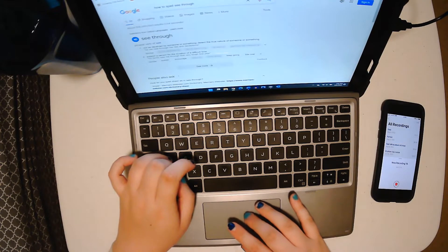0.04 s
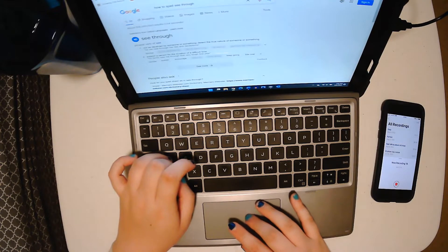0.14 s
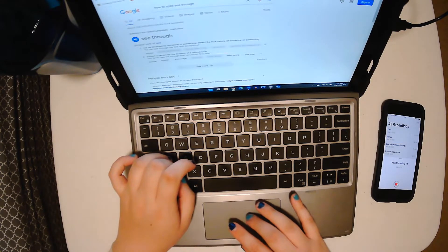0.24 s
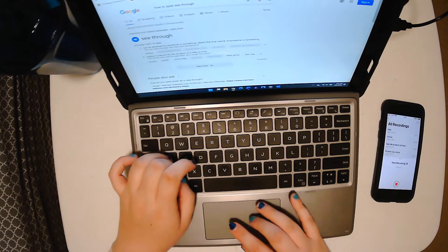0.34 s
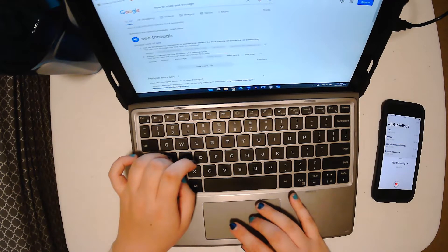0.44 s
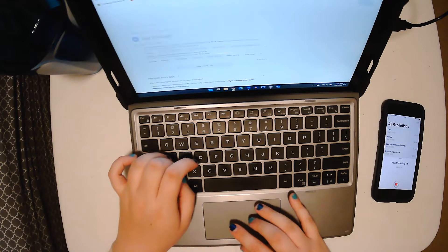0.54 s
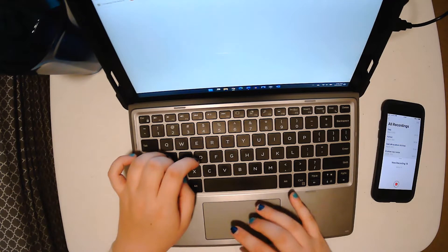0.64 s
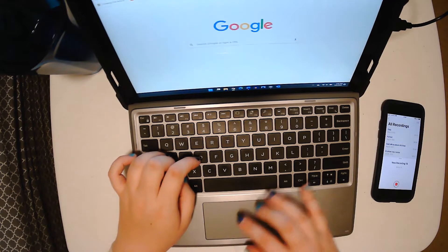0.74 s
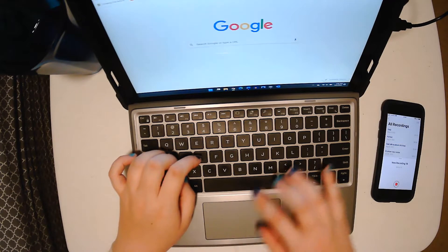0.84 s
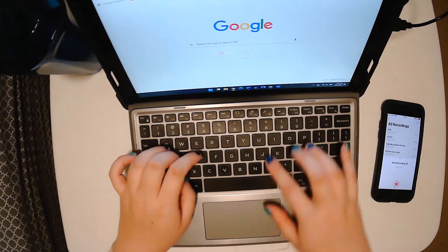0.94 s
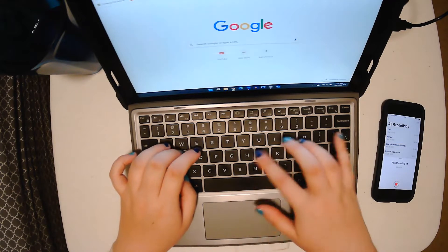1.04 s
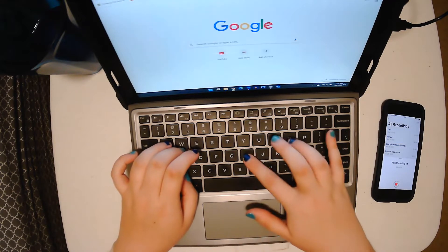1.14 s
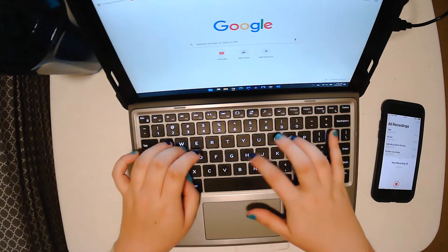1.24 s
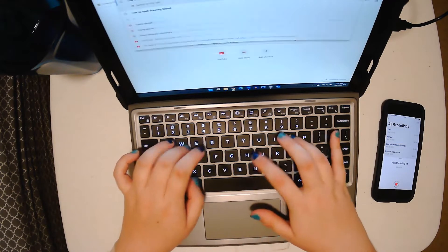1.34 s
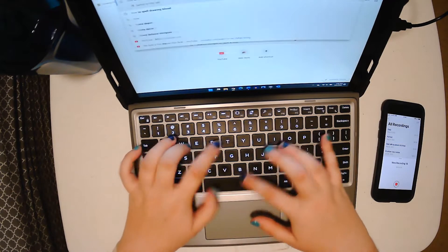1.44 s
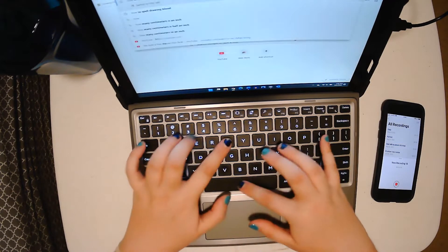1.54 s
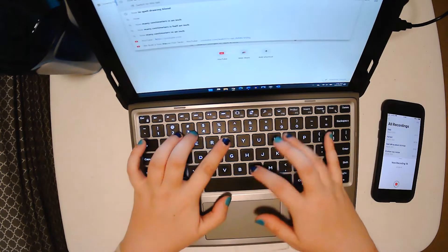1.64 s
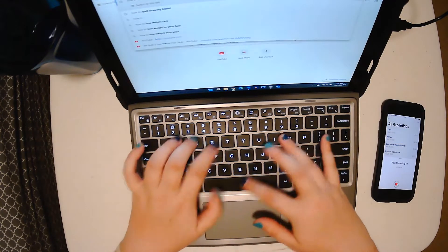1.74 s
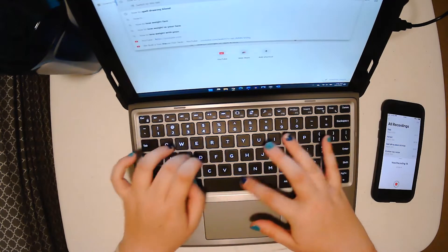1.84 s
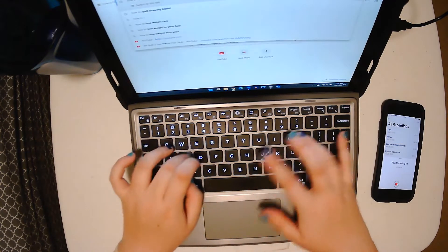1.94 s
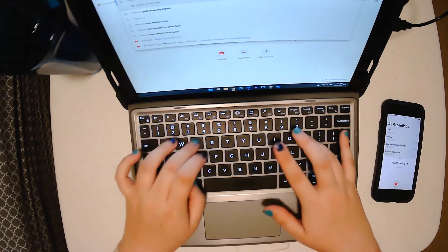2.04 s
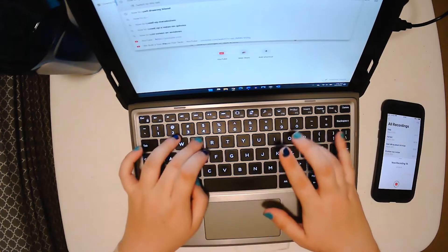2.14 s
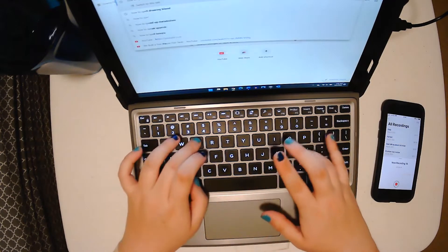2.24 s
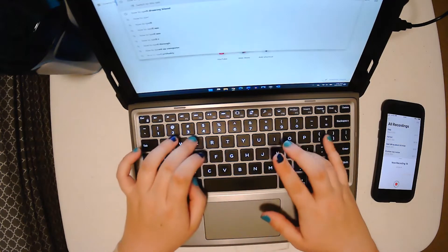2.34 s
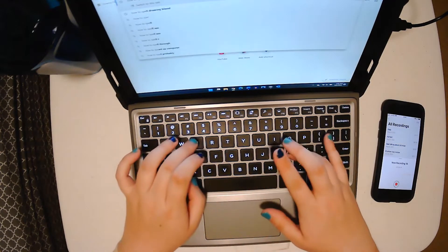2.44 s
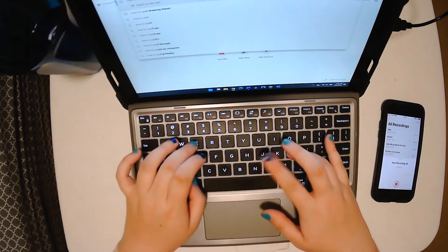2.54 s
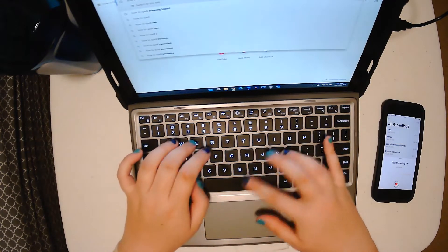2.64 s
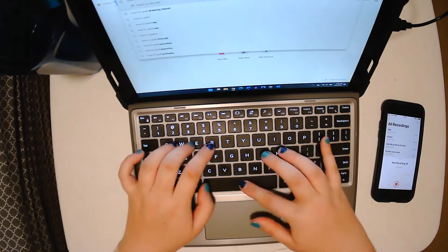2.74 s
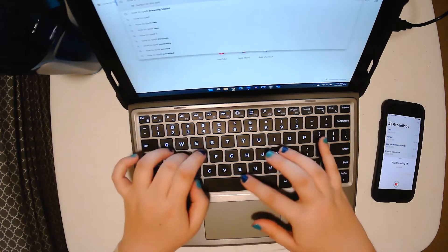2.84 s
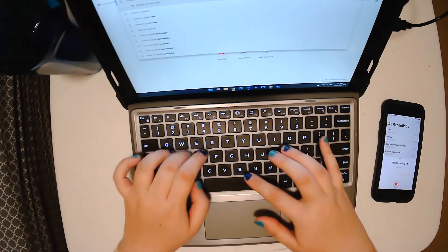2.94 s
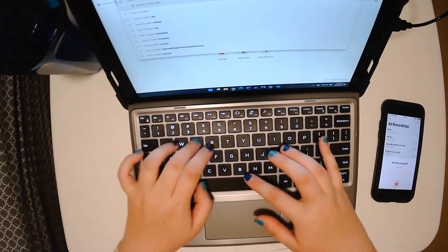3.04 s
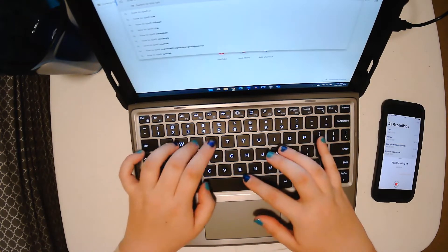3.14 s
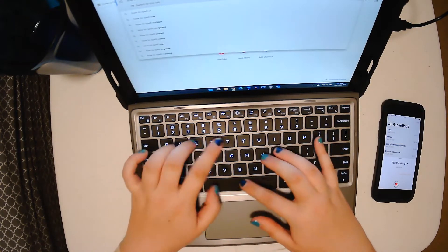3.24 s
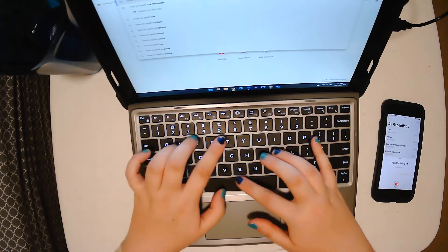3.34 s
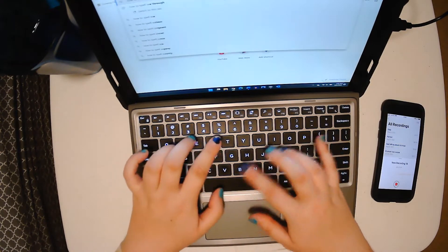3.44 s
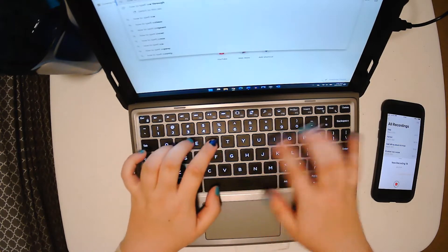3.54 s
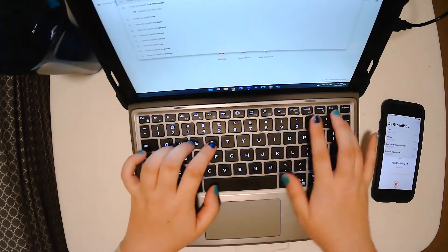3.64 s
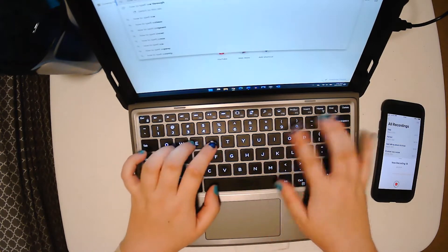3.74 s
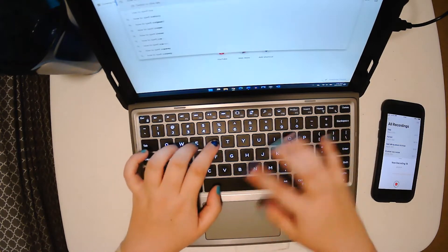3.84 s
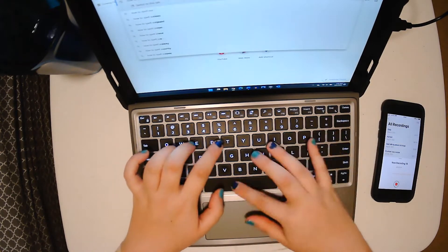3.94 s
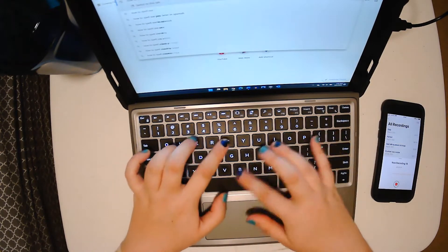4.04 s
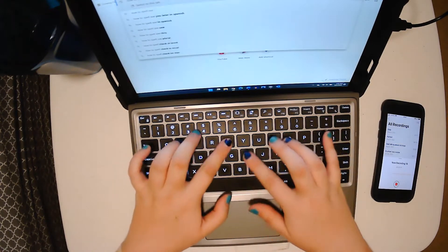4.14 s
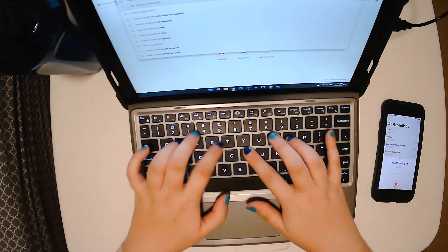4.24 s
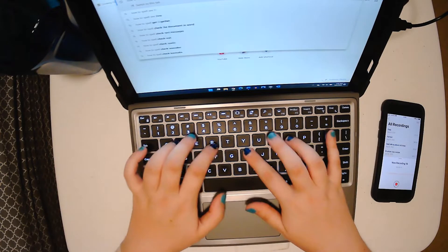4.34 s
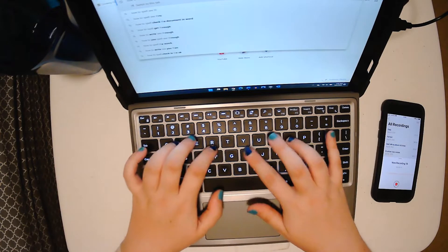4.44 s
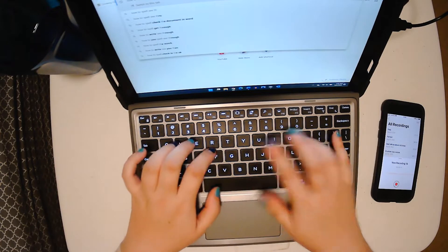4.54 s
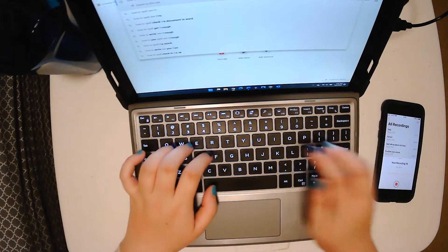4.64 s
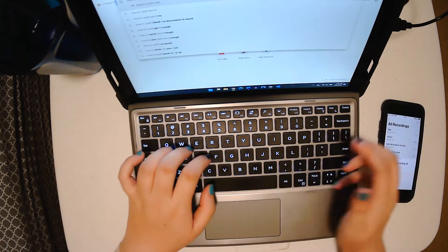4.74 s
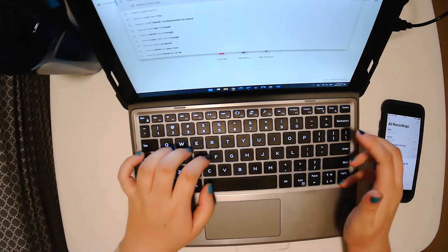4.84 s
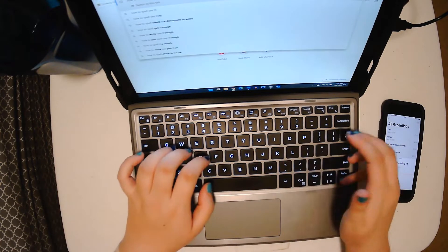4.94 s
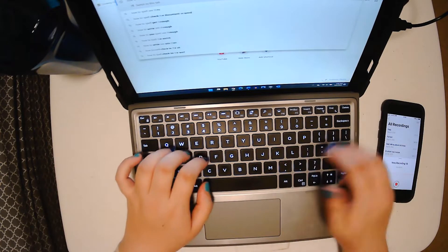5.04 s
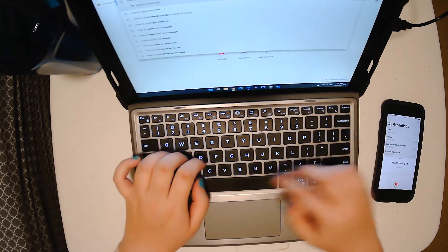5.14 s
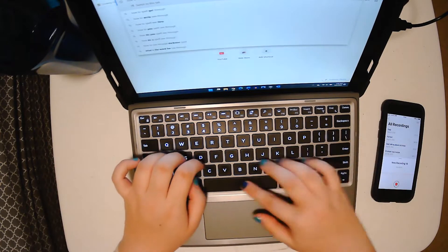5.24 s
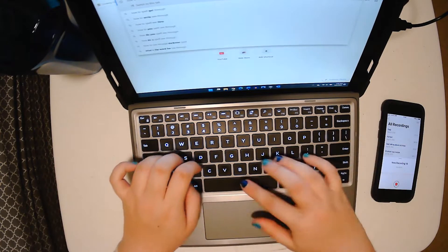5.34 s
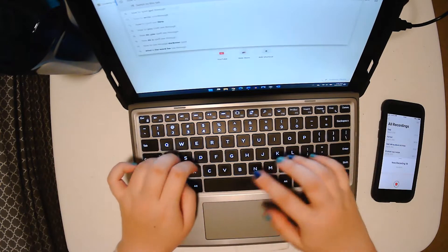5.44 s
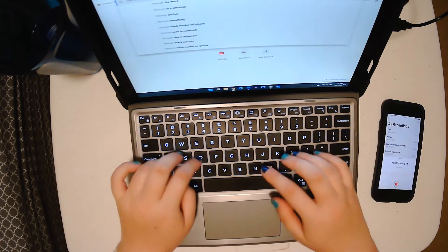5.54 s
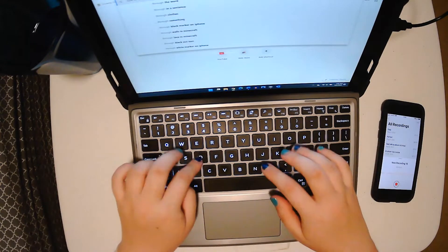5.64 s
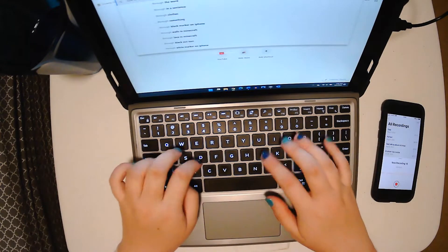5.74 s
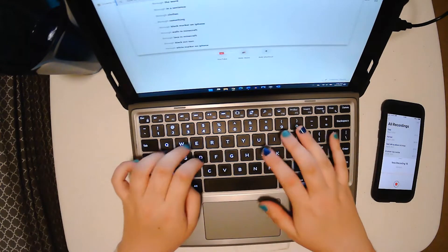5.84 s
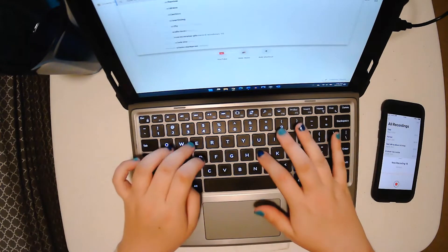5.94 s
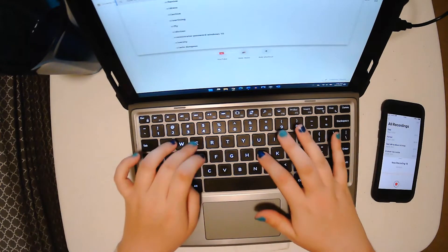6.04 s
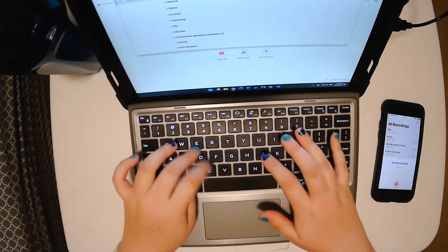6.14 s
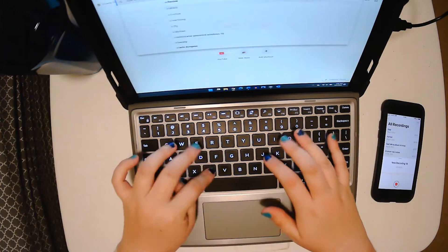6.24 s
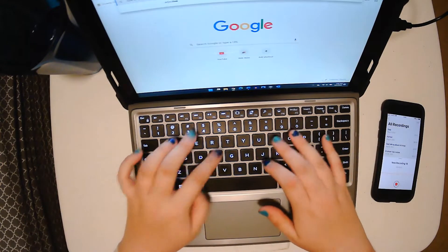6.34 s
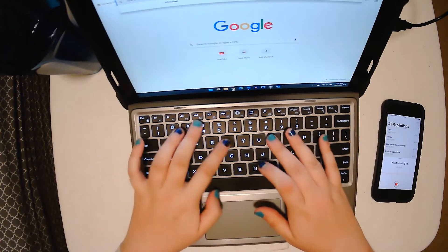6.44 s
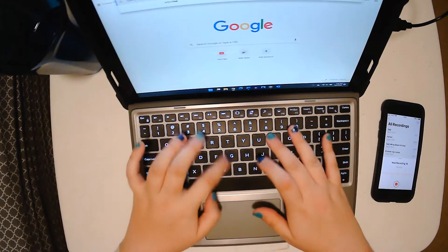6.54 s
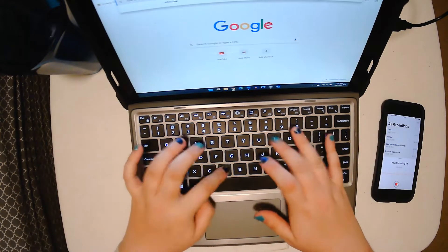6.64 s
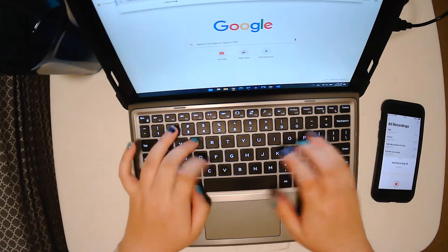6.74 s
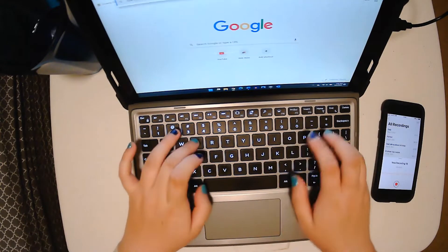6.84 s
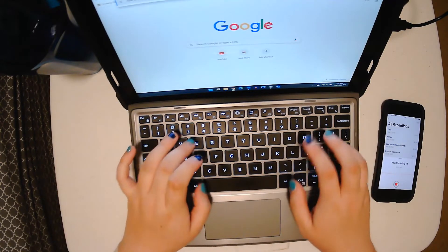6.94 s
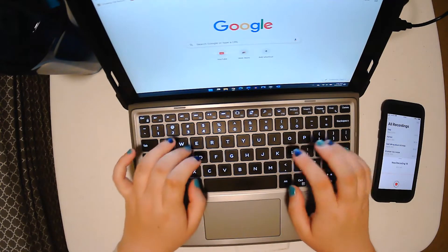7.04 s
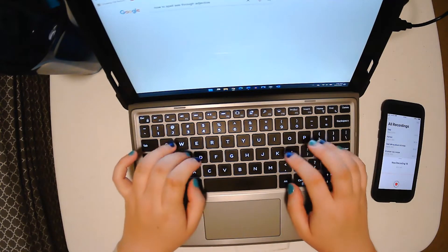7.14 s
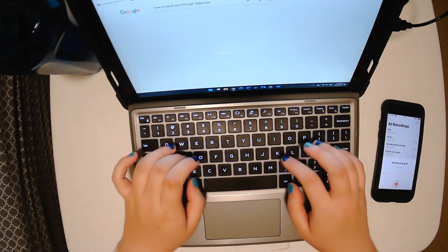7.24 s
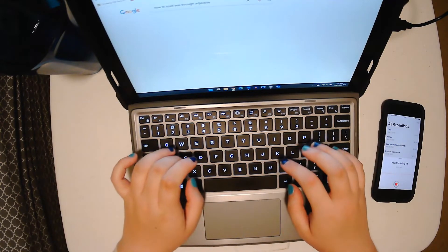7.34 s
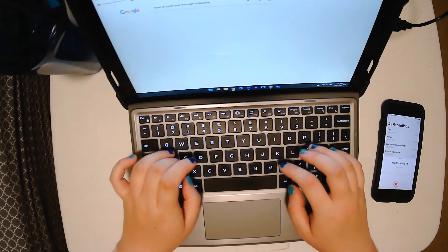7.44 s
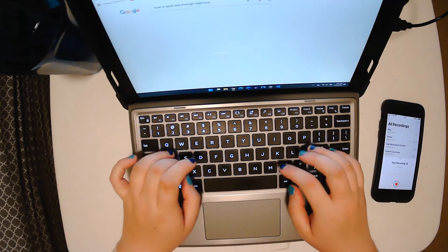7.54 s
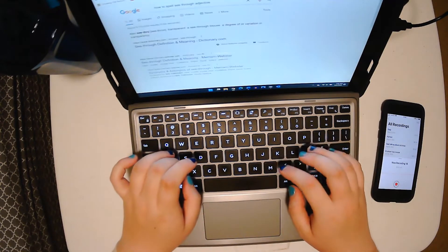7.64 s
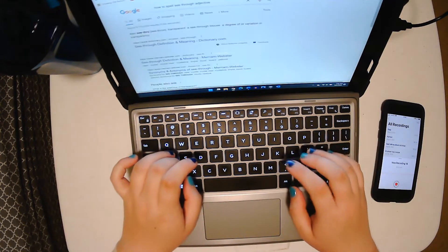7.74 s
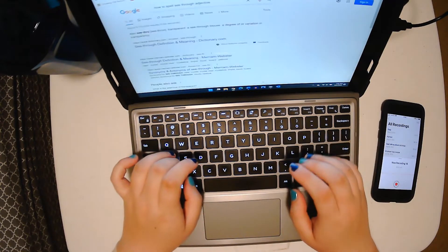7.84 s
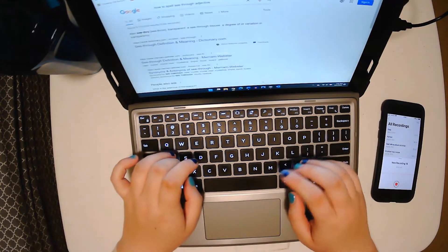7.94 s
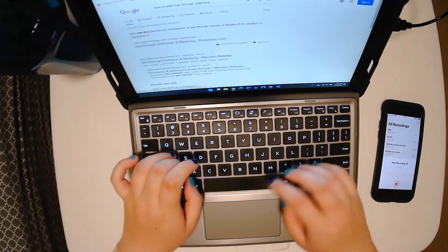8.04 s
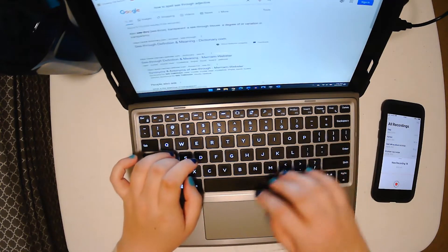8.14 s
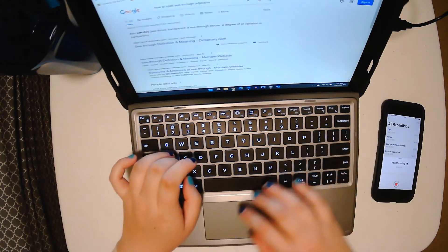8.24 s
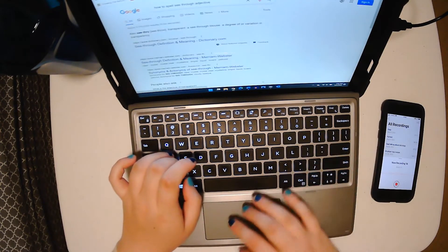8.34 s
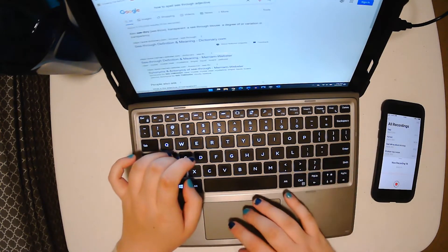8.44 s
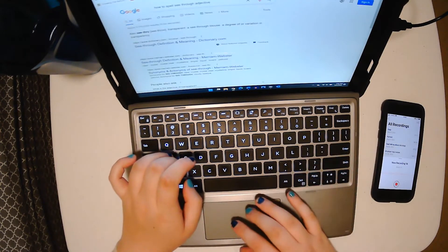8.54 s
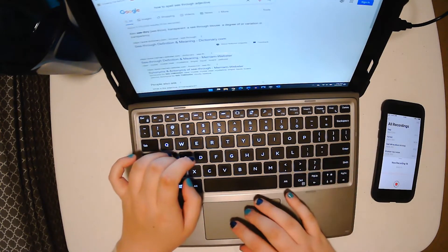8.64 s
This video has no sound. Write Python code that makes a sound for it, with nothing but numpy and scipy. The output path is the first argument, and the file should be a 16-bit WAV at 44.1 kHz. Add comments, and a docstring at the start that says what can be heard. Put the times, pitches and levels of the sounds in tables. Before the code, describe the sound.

Close above a laptop on a table in a quiet room, one channel. After a near-silent second with a faint bump and a hand graze, fingernails type in quick uneven bursts, with low double booms from the space bar. Brief gaps break the runs. One key is slammed hard near six seconds, more fast strokes follow, then a light enter click, quiet, and a dull touchpad thump.

```python
"""A quiet room, close above a laptop on a table: quick runs of typing.
Each stroke layers a fingernail tick, the key's snap, a clack as it lands, a knock in the case and a thud in the table.
Snap, clack and knock are shaped noise and impulses; the deck, lid and table ring as decaying sines.
The space bar booms on the way down and again on the way up; hands graze and bump, and a touchpad thumps late on.
Skin brushes the case as swells of grainy noise; a low hum of sines and a faint coloured hiss lie underneath."""
import sys
import numpy as np
from scipy import signal
from scipy.fft import rfft, irfft, next_fast_len
from scipy.io import wavfile
from scipy.ndimage import uniform_filter1d

SR = 44100
rng = np.random.default_rng(int(sys.argv[2]) if len(sys.argv) > 2 else 0)


def file_out(sig):
    """Save sig as 16-bit WAV at sys.argv[1]."""
    # one column per channel
    cols = np.atleast_2d(sig).T
    # limit, then scale
    lim = np.clip(cols, -1, 1)
    pcm = np.round(lim * 32767).astype(np.int16)
    wavfile.write(sys.argv[1], SR, pcm)


N = 383229  # length in samples

# Room air colour. Each row: frequency in Hz, relative level in dB.
AIR_SPECTRUM = [(12, -18), (24, -8.5), (38, -19.5), (55, -20), (91, -21.5), (123, -22), (262, -32),
                (527, -40.5), (1120, -44), (2400, -48), (3200, -48.5), (8000, -55), (13000, -60),
                (15500, -68), (16200, -80)]
# Steady hum tones. Each row: frequency in Hz, rms level in dB.
HUM_TONES = [(26.7, -50.5), (119.5, -68)]
# Decay of the room's tail. Each row: frequency in Hz, t60 (time to fall by 60 dB) in seconds.
ROOM_DECAY = [(100, 0.3), (500, 0.33), (2000, 0.33), (8000, 0.19), (15000, 0.061)]
# Skin sliding on the case. Each row: centre in seconds, standard deviation of the swell in seconds, peak level in dB.
BRUSHES = [(.776, .012, -60), (.82, 0.043, -64), (0.866, 0.01, -45.5), (1.125, .03, -60),
           (1.185, .045, -54.5), (1.408, 0.028, -64), (1.997, 0.04, -60), (4.146, 0.064, -61.5),
           (4.95, 0.088, -59.5), (5.39, 0.053, -58.5), (8.28, 0.018, -51.5)]
# Colour of skin friction. Each row: frequency in Hz, relative level in dB.
SKIN_SPECTRUM = [(150, -18), (600, 1.5), (1300, -4.5), (2200, -1.5), (2700, 2), (3400, -0.5), (5300, -1.5),
                 (7000, -6.5), (10000, -3.5), (13000, -10), (16000, -19)]
# Colour of the touchpad thump. Each row: frequency in Hz, relative level in dB.
TOUCHPAD_SPECTRUM = [(60, -14), (150, -1.5), (290, 1.5), (450, -6), (620, -2.5), (850, -22), (1500, -22),
                     (2300, -17.5), (3500, -32)]
# Blows that shake the lid. Each row: start in seconds, level in dB.
LID_JOLTS = [(1.935, -33.5), (4.686, -52.5), (4.876, -52), (5.776, -42.5), (6.621, -40), (7.127, -30.5)]
# Modes of the open lid. Each row: frequency in Hz, relative level in dB, t60 in seconds.
LID_MODES = [(226, -9, 0.18), (295, -4.5, 0.2), (370, 0, 0.061), (478, -1, 0.12), (566, 1.5, .14),
             (607, 0, 0.087), (761, 0, 0.046), (904, -8, 0.069), (1007, 3.5, 0.047), (1300, -3, 0.041)]
# Fingers that graze a key without pressing it. Each row: start in seconds, force in dB, snap in dB.
GRAZES = [(0.778, -50, -57), (0.8679, -45, -46.5), (1.3447, -58, -57), (1.941, -35.5, -55),
          (2.724, -54.5, -58), (4.509, -51.5, -69), (4.688, -53, -68), (4.88, -55, -74)]
# A resting hand shifts its weight. Each row: start in seconds, table thud in dB.
BUMPS = [(0.326, -34.5), (7.58, -45.5)]
# Colour of the snap under the nail. Each row: frequency in Hz, relative level in dB before tilt and scatter.
SNAP_SPECTRUM = [(900, -18), (2500, -4.5), (4200, -6.5), (5500, -4), (7500, -2), (9600, -3), (11500, -10.5),
                 (13800, -12.5), (15500, -26), (16500, -33)]
# Colour of the keycap clack. Each row: frequency in Hz before a small random shift, relative level in dB.
KEYCAP_SPECTRUM = [(400, -24), (780, -11), (950, -9.5), (1170, 3.5), (1420, -1), (1680, -0.5), (1900, -3.5),
                   (2250, -7.5), (2700, -22.5), (4500, -36.5)]
# Colour of the case knock. Each row: frequency in Hz before a small random shift, relative level in dB.
CASE_SPECTRUM = [(170, -22), (250, -9.5), (300, 4.5), (345, 2), (400, 2), (450, 0.5), (510, 2), (580, -4.5),
                 (680, -7.5), (790, -5.5), (950, -16), (1300, -31)]
# Modes of the deck under the keys. Each row: frequency in Hz, relative level in dB, t60 in seconds.
DECK_MODES = [(166.1, -3.5, 0.071), (198, 1, 0.066), (215.7, -10, 0.098)]
# Modes of the table. Each row: frequency in Hz, relative level in dB, t60 in seconds.
TABLE_MODES = [(53.7, -2.5, 0.22), (74.4, -1.5, 0.17), (112.8, -0.5, 0.17)]
# Space bar presses. Each row: start in seconds, time held down in seconds, force in dB.
SPACE_BAR_PRESSES = [(1.686, .0815, -39), (1.9529, .0724, -34.5), (2.86, 0.096, -36.5),
                     (3.4243, 0.073, -40), (4.1059, .0719, -36.5), (5.4212, .0734, -34.5)]
# Letter and control keys. Each row: start in seconds, landing force in dB, snap in dB, keycap clack in dB.
STROKES = [(1.355, -44, -64, -58), (1.429, -44.5, -67, -53), (1.468, -35, -38.5, -34.5),
           (1.5505, -38, -49.5, -46.5), (1.608, -46.5, -60, -53), (1.748, -42, -56.5, -55),
           (1.8364, -36.5, -40, -34.5), (1.907, -49, -59, -56), (2.0543, -48, -49, -48),
           (2.139, -50, -65, -65), (2.1683, -37.5, -34, -32.5), (2.243, -45.5, -60, -59),
           (2.284, -47, -59, -55), (2.358, -54, -64, -70), (2.6091, -44, -41, -46.5),
           (2.673, -49.5, -58.5, -61), (2.7357, -57, -49.5, -50), (2.7937, -46.5, -53.5, -57.5),
           (3.0255, -39, -46, -47), (3.115, -53.5, -63, -61.5), (3.226, -49, -61.5, -56),
           (3.288, -57.5, -65, -72), (3.8233, -41, -37.5, -55), (3.9121, -50.5, -51, -54),
           (3.979, -40.5, -56.5, -51), (4.047, -51.5, -60.5, -62), (4.305, -39.5, -62, -53.5),
           (4.372, -51, -73, -66), (4.394, -45, -67, -60), (4.452, -48, -73, -66), (4.548, -47, -58, -63),
           (5.1385, -53.5, -48.5, -57), (5.2221, -51, -52, -51), (5.637, -39, -54.5, -49.5),
           (5.746, -48, -46.5, -57), (5.7765, -44, -54, -46), (5.8531, -54.5, -61.5, -64),
           (6.202, -42.5, -62, -59), (6.23, -47, -58.5, -56.5), (6.31, -48.5, -78, -60.5),
           (6.3658, -53.5, -54, -60), (6.39, -63, -62, -60.5), (6.4709, -50.5, -58.5, -66),
           (6.6194, -36.5, -51, -42.5), (6.688, -51, -58, -58), (6.7271, -34.5, -40.5, -35),
           (6.7833, -47, -53.5, -64), (6.799, -44, -63.5, -55.5), (6.867, -48.5, -63, -65),
           (6.9407, -37, -45.5, -47.5), (7.0089, -57, -41.5, -55), (7.0354, -45, -38.5, -41)]
# How firmer landings and sharper snaps shake the heavy parts.
# Each holds: level of a typical stroke in dB, dB per dB of force, dB per dB of snap.
DECK_LAW = (-38, 0.35, 0.11)
TABLE_LAW = (-34.5, 0.36, 0.18)
# More nail and less force brighten the snap.
# It holds: tilt in dB per octave when snap equals force, its growth per dB, its most in dB per octave.
BRIGHTNESS_LAW = (1.8, .33, 5)

TYPICAL_FORCE_DB, TYPICAL_SNAP_DB = -45, -52
TOP_HZ = 16200
LEVEL_SPAN_S = .01  # a stroke's dB is its energy spread over this time
LEAD_S = .02  # time left for the nail's touch before each snap
NAIL_LAG_S, PAD_LAG_S = .0007, .0035  # from the snap to the landing
SPRING_DB = -44  # the space bar's spring throws it back with the same force every time
SLAM_S, ENTER_S = 6.1351, 7.1118  # when the two big keys are hit


def amp(db):
    """Decibels to gain."""
    return 10 ** (np.asarray(db) / 20)


def unit(x):
    """Scale to rms 1."""
    return x / np.sqrt(np.mean(x ** 2) + 1e-20)


def burst(x):
    """Scale a short sound to the energy of a 0 dB stroke."""
    return x * np.sqrt(LEVEL_SPAN_S * SR / (np.sum(x ** 2) + 1e-20))


def add(track, s, x):
    """Mix x into the track at time s."""
    part = track[max(round(s * SR), 0):][:len(x)]
    part += x[:len(part)]


def along(points, hz):
    """Read (Hz, value) points on a log frequency axis."""
    f, v = np.transpose(points)
    return np.interp(np.log(hz + 1), np.log(f + 1), v)


def fade(t, t60):
    """Exponential decay that starts at t = 0."""
    return (t >= 0) * np.exp(-np.log(1000) * np.maximum(t, 0) / t60)


def swell(t, rise, t60):
    """Grow towards t = 0 with time constant rise, then die away."""
    return np.exp(np.minimum(t, 0) / rise - np.log(1000) * np.maximum(t, 0) / t60)


def noise(spectrum):
    """Steady coloured noise of rms 1."""
    m = next_fast_len(N + SR // 2)
    gain = amp(along(spectrum, np.fft.rfftfreq(m, 1 / SR)))
    return unit(irfft(rfft(rng.standard_normal(m)) * gain, m)[:N])


def coloured(x, spectrum):
    """Causal (minimum-phase) colouring of a sound, so that its attack stays sharp."""
    m = len(x)
    gain = amp(along(spectrum, np.fft.rfftfreq(m, 1 / SR)))
    cepstrum = irfft(np.log(gain), m)
    # fold the cepstrum onto positive time
    cepstrum[1:m // 2] *= 2
    cepstrum[m // 2 + 1:] = 0
    return irfft(rfft(x) * np.exp(rfft(cepstrum)), m)


def grit(count, rate, depth_db):
    """White noise made uneven by tiny catches between two surfaces, rate of them a second."""
    knots = rng.standard_normal(int(count * rate / SR) + 2)
    position = np.arange(count) * rate / SR
    catches = np.interp(position, np.arange(len(knots)), knots)
    return rng.standard_normal(count) * amp(depth_db * catches)


def background(air_db):
    """Room air as coloured noise, with a deep machine rumble and mains hum as sines."""
    t = np.arange(N) / SR
    hum = sum(amp(db) * np.sqrt(2) * np.sin(2 * np.pi * (hz * t + rng.random())) for hz, db in HUM_TONES)
    return hum + amp(air_db) * noise(AIR_SPECTRUM)


def room(x):
    """The room's short tail: four tails of decaying noise take turns, seven turns a second."""
    out, t = np.zeros(N), np.arange(N) / SR
    tails = 4
    for k in range(tails):
        hz, age, z = signal.stft(rng.standard_normal(SR // 2), SR, nperseg=256)
        decay = fade(age, along(ROOM_DECAY, hz)[:, None])
        tail = signal.istft(z * decay, SR, nperseg=256)[1]
        turn = np.floor(t * 7) % tails == k
        feed = x * uniform_filter1d(turn * 1., size=400)  # short crossfades between turns
        add(out, .006, signal.fftconvolve(feed, tail / np.linalg.norm(tail)))
    return out


def brushing():
    """Grainy swells of friction as a hand shifts on the case."""
    t = np.arange(N) / SR
    friction = grit(next_fast_len(N, real=True), rate=800, depth_db=2.0)
    rub = unit(coloured(friction, SKIN_SPECTRUM))[:N]
    return rub * sum(amp(db) * np.exp(-.5 * ((t - s) / width) ** 2) for s, width, db in BRUSHES)


def ring(modes, rise, scatter_db, detune):
    """A struck part rings in decaying sines; each blow varies their strength, sign and exact pitch."""
    t = np.arange(SR // 5) / SR
    hz, db, t60 = np.transpose(modes)[:, :, None]
    size, shift, side = rng.standard_normal((3, len(modes), 1))
    level = np.sign(side) * amp(db + scatter_db * size)
    waves = level * fade(t, t60) * np.sin(2 * np.pi * hz * (1 + detune * shift) * t)
    onset = 1 - np.exp(-(t / rise) ** 2)
    return burst(waves.sum(axis=0) * onset)


def strike(spectrum, lead, rise, t60, chatter_db, spread):
    """One push amid chatter drives a damped plate, whose bending waves arrive later the lower they are."""
    t = np.arange(SR // 8) / SR - lead
    push = np.arange(len(t)) == round(lead * SR)
    chatter = burst(swell(t, rise, t60) * rng.standard_normal(len(t)))
    force = burst(push * 1.) + amp(chatter_db) * chatter
    hz = np.fft.rfftfreq(len(t), 1 / SR)
    distance = rng.uniform(.6, 1.2)
    pitch = np.exp(rng.normal(0, 0.036))  # each strike sounds a little different
    # at 1 kHz the delay is spread (s) times distance
    travel = np.exp(-4j * np.pi * spread * distance * np.sqrt(1000 * hz))
    plate = coloured(force, [(f * pitch, db) for f, db in spectrum])
    return burst(irfft(rfft(plate) * travel, len(t)))


def snap(lead, lag, tilt, softness, rise, t60, nail_db, landing_db, rattle_db, rattle_t60, ragged_db):
    """The nail touches, the key snaps over after lead s, then lands and rattles briefly, all in gritty noise."""
    t = np.arange(SR // 8) / SR - lead
    touch = t + rng.uniform(0.0014, 0.0086)  # the nail comes before the snap
    life, nail, rattle = rng.standard_normal(3)
    stretch = np.exp(0.29 * life + 0.48 * softness)  # hard strokes snap cleanly, soft ones scuff
    landing = t - max(lag, rng.uniform(0.00079, 0.0035))
    shape = swell(t, rise * stretch, t60 * stretch)
    shape = shape + amp(landing_db) * swell(landing, rise * stretch, t60 * stretch)
    shape = shape + amp(nail_db + 1.1 * nail + 10.0 * softness) * swell(touch, rise * 3, 0.041)
    shape = shape + amp(rattle_db + 3.7 * rattle) * fade(t, rattle_t60)
    # each snap has its own colour, tilted about 7 kHz
    colour = [(hz, db + tilt * np.log2(max(hz, 2500) / 7000) + rng.normal(0, 2.1))
              for hz, db in SNAP_SPECTRUM]
    return burst(coloured(shape * grit(len(t), rate=1400, depth_db=ragged_db), colour))


def contact(snap_db, clack_db, knock_db, boom_db, thud_db, dull_db=0):
    """A contact travels from key to laptop to table; the heavier the part, the later it swells."""
    out = np.zeros(SR // 4)
    softness = np.clip((-48.5 - snap_db) / 15, 0, 1)  # 0 = nail first, 1 = finger pad
    press = 0.00083 + 0.0033 * softness  # seconds; a pad takes longer to load the key
    lag = NAIL_LAG_S + (PAD_LAG_S - NAIL_LAG_S) * softness
    even, growth, most = BRIGHTNESS_LAW
    tilt = min(even + growth * (snap_db - knock_db), most) - dull_db  # dB per octave
    click = snap(LEAD_S, lag, tilt, softness, rise=0.00025, t60=0.0077, nail_db=-18.5,
                 landing_db=-7.5, rattle_db=-21, rattle_t60=0.02, ragged_db=4.0)
    clack = strike(KEYCAP_SPECTRUM, LEAD_S, press, t60=0.029,
                   chatter_db=4.0 + 10 * softness, spread=0.000585)
    knock = strike(CASE_SPECTRUM, LEAD_S, press * 2, t60=0.11,
                   chatter_db=1.5 + 5.0 * softness, spread=0.002008)
    boom = ring(DECK_MODES, rise=0.0062, scatter_db=3.0, detune=0.029)
    thud = ring(TABLE_MODES, rise=0.011, scatter_db=2.0, detune=0.067)
    add(out, 0, amp(snap_db) * click)
    add(out, lag, amp(clack_db) * clack)
    add(out, lag, amp(knock_db) * knock)
    add(out, LEAD_S + lag + 0.0027, amp(boom_db) * boom)
    add(out, LEAD_S + lag + 0.0045, amp(thud_db) * thud)
    return out


def touchpad(s, db):
    """A finger drops on the touchpad, which flexes with one short, dull thump."""
    out, lead = np.zeros(N), 1 / 100
    thump = strike(TOUCHPAD_SPECTRUM, lead, rise=.0004, t60=0.039, chatter_db=-13.0, spread=0.00047)
    add(out, s - lead, amp(db) * thump)
    return out


def lid_shudder(chatter_db):
    """Some blows jolt the laptop: the open lid rings on, and its loose hinge chatters as fading noise."""
    out = np.zeros(N)
    t = np.arange(SR // 20) / SR
    for s, db in LID_JOLTS:
        chatter = burst(fade(t, 0.12) * rng.standard_normal(len(t)))
        force = burst((t == 0) * 1.) + amp(chatter_db) * chatter
        lid = ring(LID_MODES, rise=0.0029, scatter_db=1.5, detune=0.017)
        add(out, s, amp(db) * burst(signal.fftconvolve(force, lid)))
    return out


def resting_hands():
    """Grazes sound mostly in the case; a shift of weight goes almost wholly into the table."""
    out = np.zeros(N)
    for s, db, snap_db in GRAZES:
        graze = contact(snap_db, clack_db=db - 13, knock_db=db, boom_db=db - 5, thud_db=db - 3)
        add(out, s - LEAD_S, graze)
    for s, db in BUMPS:
        bump = contact(snap_db=db - 45, clack_db=db - 43, knock_db=db - 23.5, boom_db=db - 8, thud_db=db)
        add(out, s - LEAD_S, bump)
    return out


def big_keys():
    """One key is slammed hard enough to rock the table; enter ends the typing with a light flick of the nail."""
    out = np.zeros(N)
    slam = contact(snap_db=-33.5, clack_db=-37, knock_db=-28.5, boom_db=-29, thud_db=-21, dull_db=7)
    add(out, SLAM_S - LEAD_S, slam)
    enter = contact(snap_db=-36, clack_db=-44, knock_db=-40, boom_db=-39, thud_db=-40)
    add(out, ENTER_S - LEAD_S, enter)
    return out


def space_bar():
    """The long bar makes the deck boom twice: under the thumb, and again as it springs back."""
    out = np.zeros(N)
    for s, held, db in SPACE_BAR_PRESSES:
        down = contact(snap_db=db - .3, clack_db=db - 1, knock_db=db - 1,
                       boom_db=db + 7.5, thud_db=db + 1.2)
        add(out, s - LEAD_S, down)
        up = contact(snap_db=SPRING_DB + 1.8, clack_db=SPRING_DB - 9.5, knock_db=SPRING_DB - .6,
                     boom_db=SPRING_DB + 14.3, thud_db=SPRING_DB + .8, dull_db=1.2)
        add(out, s + held - LEAD_S, up)
    return out


def typing():
    """Runs of keystrokes; the deck's boom and the table's thud follow from force and snap."""
    out = np.zeros(N)
    for s, force_db, snap_db, clack_db in STROKES:
        effort = (1, force_db - TYPICAL_FORCE_DB, snap_db - TYPICAL_SNAP_DB)
        boom_db, thud_db = np.dot(DECK_LAW, effort), np.dot(TABLE_LAW, effort)
        add(out, s - LEAD_S, contact(snap_db, clack_db, force_db, boom_db, thud_db))
    return out


def scene():
    """Keys and hands in the room; the brushing and the background stay out of its tail."""
    keys = typing() + space_bar() + big_keys() + resting_hands()
    keys = keys + lid_shudder(chatter_db=-1) + touchpad(s=8.2618, db=-33.5)
    mix = keys + amp(-14.5) * room(keys) + brushing() + background(air_db=-57.5)
    return mix[None]  # one channel


def record(dry):
    """Cut everything from the band limit upwards."""
    m = next_fast_len(N + SR // 2)
    passband = np.fft.rfftfreq(m, 1 / SR) < TOP_HZ
    return irfft(rfft(dry, m) * passband, m)[..., :N]


dry = scene()
out = record(dry)
file_out(out)
```